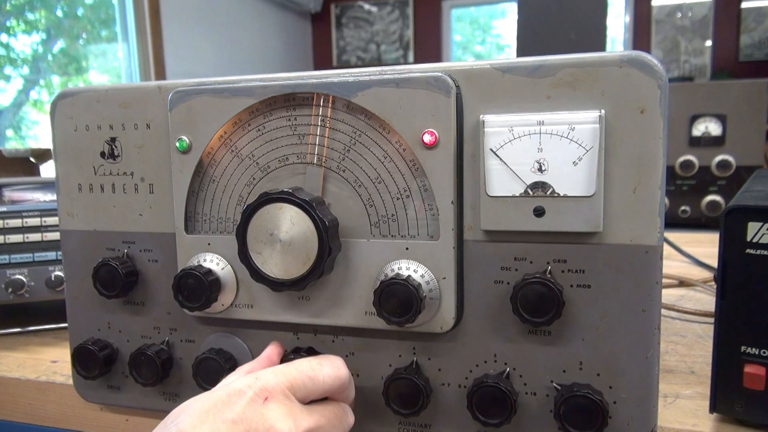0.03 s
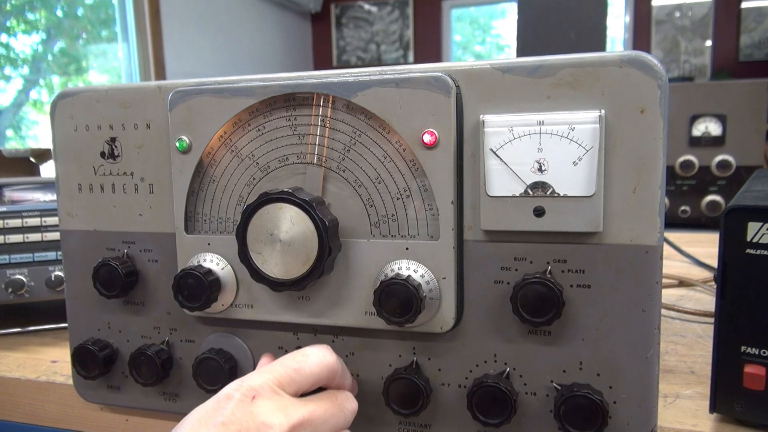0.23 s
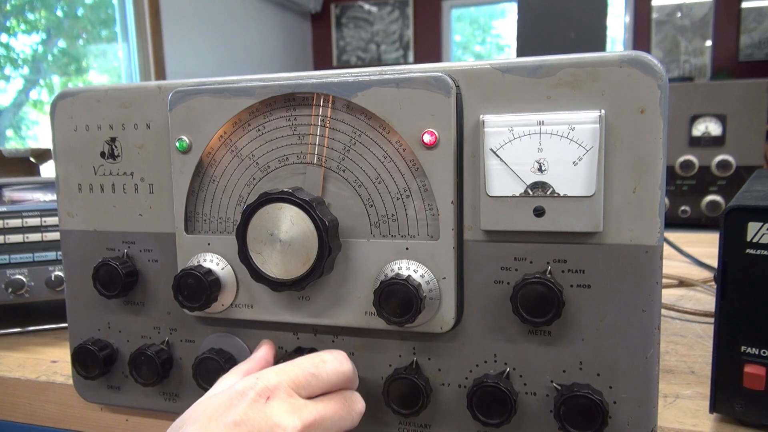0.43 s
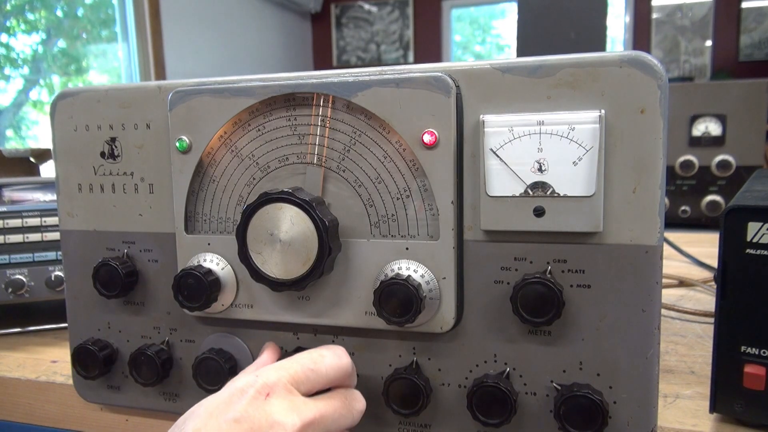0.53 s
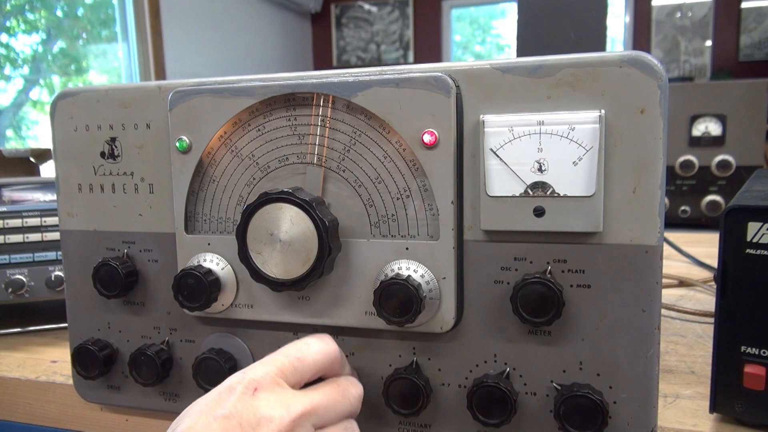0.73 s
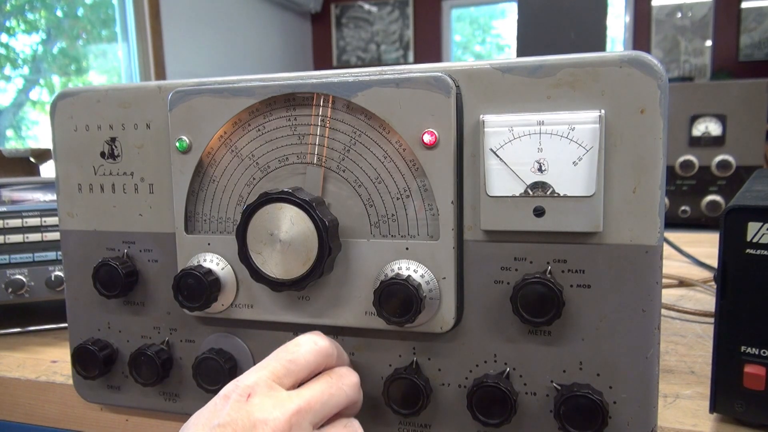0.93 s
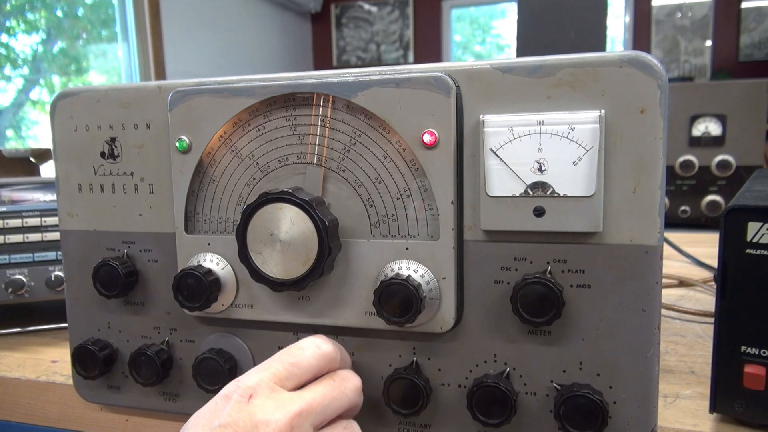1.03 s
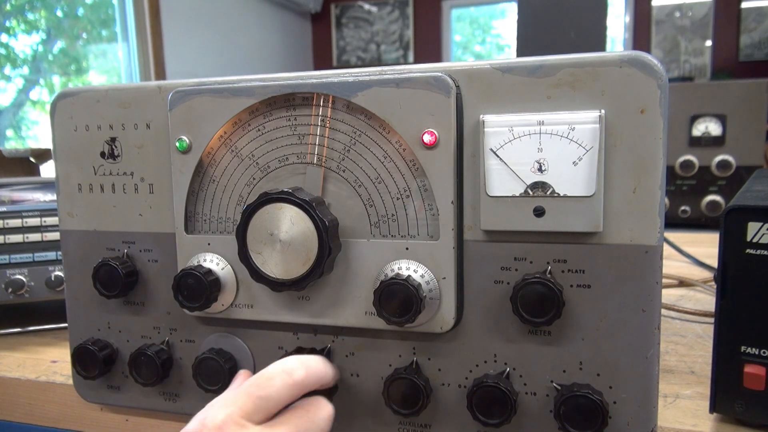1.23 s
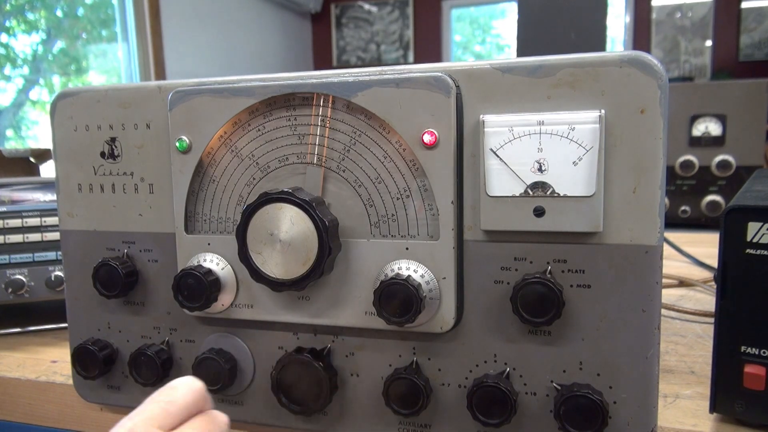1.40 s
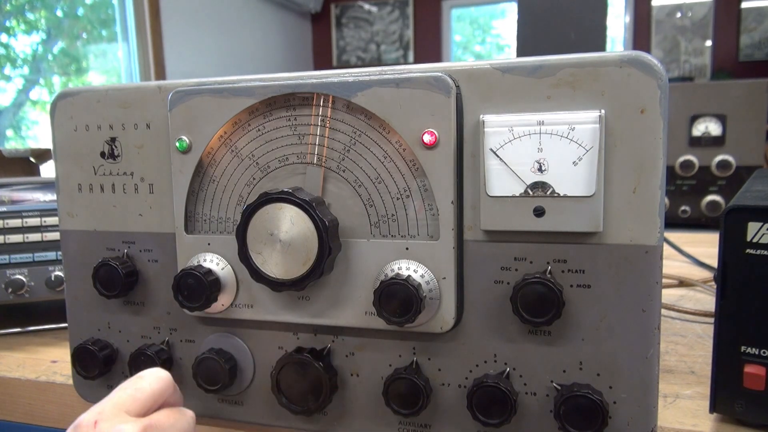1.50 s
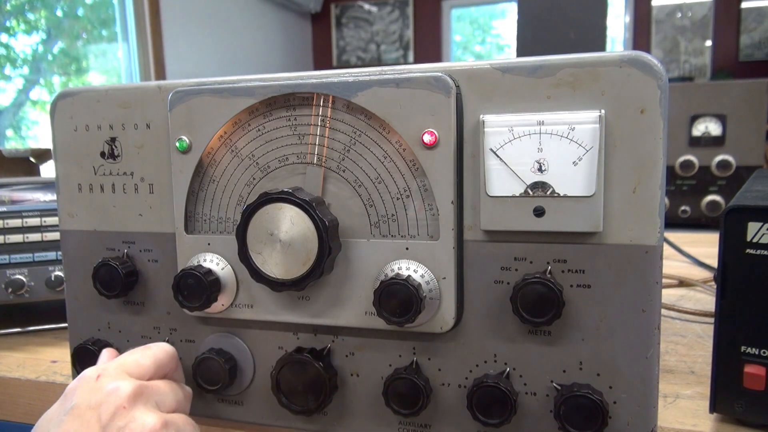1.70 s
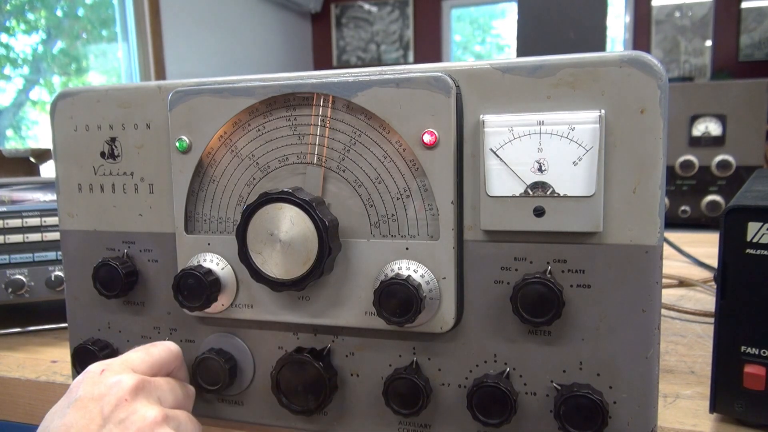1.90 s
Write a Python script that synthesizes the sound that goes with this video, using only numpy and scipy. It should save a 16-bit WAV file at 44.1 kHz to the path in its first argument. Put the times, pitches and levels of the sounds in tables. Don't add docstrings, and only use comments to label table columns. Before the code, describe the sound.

Close to a camera microphone in a small workshop, a hand turns a heavy knob: one loud metallic clack, a faint finger shift, then a second clack, over steady electrical hum and fan hiss.

```python
import sys
import numpy as np
from scipy import signal
from scipy.fft import rfft, irfft
from scipy.io import wavfile
from scipy.ndimage import uniform_filter1d

SR = 44100
rng = np.random.default_rng(int(sys.argv[2]) if len(sys.argv) > 2 else 0)


def volts_from_decibels(level):
    exponent = np.asarray(level, float) / 20
    return 10 ** exponent


def wrap_up_sound(samples):
    columns = np.atleast_2d(samples).T
    tamed = np.clip(columns, -1, 1)
    steps = np.round(tamed * 32767).astype(np.int16)
    wavfile.write(sys.argv[1], SR, steps)


N = 85995

# (time [s], level [dB], brightness [dB])
FIRST_KNOCKS = [(.197, -29, -18), (.203, -35, -7), (.208, -21, 0), (.213, -22, 6.5), (.2165, -13, -2),
                (.221, -17, 15), (.2232, -7.5, 5), (.2243, -1.5, 1.5), (.2295, -1, 2), (.236, -10, -10),
                (.242, -11.5, -3), (.249, -19, -25.5), (.260, -14.5, -2), (.281, -26, -4)]
# (time [s], level [dB], brightness [dB])
SECOND_KNOCKS = [
    (.820, -24, -4),
    (.8265, -6.5, 2.5),
    (.829, -11, 5),
    (.8325, -7, 7),
    (.837, -4, -13.5),
    (.8405, -3.5, -17),
    (.8445, -6.5, -10),
    (.849, -10, -10),
    (.870, -16, -8),
    (.936, -31, 8.5),
]


def evened(x):
    return x / np.sqrt(np.mean(x ** 2) + 1e-20)


def read(points, hz):
    f, value = np.transpose(points)
    return np.interp(np.log(hz + 1), np.log(f + 1), value)


def coloured(x, points):
    return irfft(rfft(x) * volts_from_decibels(read(points, np.fft.rfftfreq(N, 1 / SR))), N)


def drift(rate_hz):
    t = np.arange(N) / SR
    rates = rate_hz * np.geomspace(.1, 1, 12)
    return evened(sum(np.sin(2 * np.pi * (f * t + rng.random())) / np.sqrt(f) for f in rates))


def ring(knocks, modes, db, damp):
    rise_cycles, wobble_rad = 3.1, 0.64
    t, out = np.arange(N) / SR, np.zeros(N)
    since = np.maximum(t - np.array(knocks)[:, :1], 0)
    strength = volts_from_decibels(np.array(knocks)[:, 1:2])
    for hz, width_hz, level_db in modes:
        swell = 1 - np.exp(-since * hz / rise_cycles)
        decay = np.exp(-np.pi * width_hz * damp * since / 2)
        energy = ((strength * swell * decay) ** 2).sum(0)
        shake = wobble_rad * evened(uniform_filter1d(rng.standard_normal(N), size=500))
        tone = np.sin(2 * np.pi * (hz * t + rng.random()) + shake)
        out = out + volts_from_decibels(db + level_db) * np.sqrt(energy) * tone
    return out


def cabinet_ring():
    # (frequency [Hz], width [Hz], level [dB])
    first_modes = [(503.5, 23, -2), (660, 44, 0.5), (835, 51, 7.5), (1165, 14, -11), (1371, 23.5, -15),
                   (1463, 24, -12), (1610, 23, -4.5), (1761, 51, 0.5), (2380, 18, -19.5), (291, 26.6, 2),
                   (380.8, 17.3, -5.5)]
    # (frequency [Hz], width [Hz], level [dB])
    second_modes = [(487, 21, -10), (629.4, 24, -9.5), (829, 72, -11), (1250, 380, -16), (1520, 19, -42),
                    (1581, 43, 6), (2002, 34, -10), (2180, 43, -23), (445, 37, -18), (1062, 69, -4),
                    (3086, 39, -3.5), (3140, 9.3, -20), (1572, 16, -13)]
    first = ring(FIRST_KNOCKS, first_modes, db=-7.5, damp=2.15)
    return first + ring(SECOND_KNOCKS, second_modes, db=-5.5, damp=2.05)


def bench_thump():
    # (time [s], level [dB])
    thumps = [
        (.232, -24),
        (.84, -28),
        (.89, -35),
    ]
    # (frequency [Hz], width [Hz], level [dB])
    bench_modes = [(151.6, 14.4, 1.5), (205, 21, -7), (248, 18.5, 0), (283, 20, 5.5)]
    return ring(thumps, bench_modes, db=0, damp=0.7)


def bursts(knocks, bright):
    rise_s, t60_s = 0.0004, 0.021
    out, t = np.zeros(N), np.arange(2000) / SR
    for s, db, bright_db in knocks:
        shape = np.minimum(t / rise_s, 1) * volts_from_decibels(db + bright * bright_db - 60 * t / t60_s)
        out[round(s * SR):][:2000] += shape * rng.standard_normal(2000)
    return out


def crack(knocks, colour):
    treble_hz, crack_db = 2500, -4.5
    unit = np.sqrt(np.mean(volts_from_decibels(read(colour, np.fft.rfftfreq(N, 1 / SR))) ** 2))
    low, high = (signal.butter(2, treble_hz, kind, fs=SR) for kind in ("low", "high"))
    edge = signal.lfilter(*low, bursts(knocks, False)) + signal.lfilter(*high, bursts(knocks, True))
    return volts_from_decibels(crack_db) * coloured(edge, [(60, -74)] + colour) / unit


def switch_cracks():
    # (time [s], level [dB], brightness [dB])
    touches = [
        (.578, -57, 17),
        (.584, -43.5, 15.5),
        (1.766, -45, 3),
    ]
    # (frequency [Hz], density [dB per Hz])
    first_colour = [(180, -47), (300, -1.5), (1240, -6.5), (1730, -1), (2090, -15), (2660, -9), (7860, -19),
                    (13500, -39)]
    # (frequency [Hz], density [dB per Hz])
    second_colour = [(240, -12), (400, -5.5), (1570, -5), (3090, -13.5), (4490, -9), (9810, -24.5),
                     (12700, -29), (14500, -97)]
    return crack(FIRST_KNOCKS, first_colour) + crack(SECOND_KNOCKS + touches, second_colour)


def room(x, sent):
    # (frequency [Hz], t60 [s])
    room_t60 = [(200, 0.38), (530, 0.43), (1390, 0.27), (3680, 0.29), (9700, 0.29)]
    # (frequency [Hz], side minus mid [dB])
    click_side = [(60, -35), (110, -41), (200, -17), (380, -16), (700, -9.5), (1290, -4), (2380, -4.5),
                  (4400, -8.5), (8120, -5), (15000, -14)]
    # (frequency [Hz], left minus right [dB])
    left_lean = [(60, -4), (110, 4.5), (200, -1.5), (380, 1.5), (700, -0.5), (1290, -1), (2380, 2),
                 (4400, 2.5), (8120, 3), (15000, -4)]
    room_db, gap_s = -1.5, 0.0033
    taps = np.zeros((2, SR // 2))
    slots = np.arange(0, SR // 2 - 20, 20)
    at = slots + rng.integers(0, 20, (2, len(slots)))
    np.put_along_axis(taps, at, rng.choice([-1., 1.], (2, len(slots))), 1)
    hz, t, z = signal.stft(taps, SR, nperseg=256)
    tail = signal.istft(z * volts_from_decibels(-60 * t / read(room_t60, hz)[:, None]), SR, nperseg=256)[1]
    tail = tail * np.minimum(np.arange(tail.shape[1]) / SR / gap_s, 1)
    mid, side = signal.fftconvolve(sent[None], tail / np.linalg.norm(tail[0]), axes=1)[:, :N]
    mid = x + volts_from_decibels(room_db) * mid
    side = coloured(side, click_side)
    half = np.array(left_lean) * [1, .5]
    return np.array([coloured(mid, half) + side, coloured(mid, half * [1, -1]) - side])


def switch():
    rings = cabinet_ring() + bench_thump()
    cracks = switch_cracks()
    heard = room(rings + cracks, sent=volts_from_decibels(-6) * rings + cracks)
    low_cut = signal.butter(4, 120, "high", fs=SR, output="sos")
    return signal.sosfilt(low_cut, heard)


def hum():
    # (time [s], pitch [Hz], level [dB], buzz [dB])
    hum_course = [(0, 101.5, -39, 8.5), (.2, 103.5, -35, -1), (0.299, 101.7, -36.5, -32),
                  (.45, 101.7, -35, 6.5), (.6, 101.3, -35, 3.5), (.78, 100.3, -39, -4),
                  (1.0, 100.2, -38.5, 3), (1.2, 100.4, -34, -4.5), (1.45, 101, -34, 0),
                  (1.65, 101.7, -31.5, -8.5), (1.95, 102, -30, -4.5)]
    # (multiple [of pitch], level [dB], waver [dB])
    hum_overtones = [(2, -19, 5.5), (3, -12, 1.1)]
    s, hz, db, buzz_db = np.transpose(hum_course)
    t = np.arange(N) / SR
    turn = 2 * np.pi * np.cumsum(np.interp(t, s, hz)) / SR
    tone = volts_from_decibels(0.97 * drift(12)) * np.sin(turn)
    buzz = [np.zeros(N), np.interp(t, s, buzz_db)]
    for (multiple, level_db, waver_db), extra_db in zip(hum_overtones, buzz):
        gain = volts_from_decibels(level_db + extra_db + waver_db * drift(30.09))
        tone = tone + gain * np.sin(multiple * turn + multiple)
    return np.sqrt(2) * volts_from_decibels(np.interp(t, s, db)) * tone


def fan():
    # (frequency [Hz], rms level [dB])
    fan_orders = [(26.9, -64), (53.8, -66), (102.3, -36), (129.2, -59.5), (156.1, -54), (209.9, -60.5),
                  (236.9, -68.5), (258.4, -68.5)]
    makeup_db, waver_db = 3.5, 3
    t, out = np.arange(N) / SR, np.zeros(N)
    for hz, db in fan_orders:
        if abs(hz - 101) > 8:
            gain = np.sqrt(2) * volts_from_decibels(db + makeup_db + waver_db * drift(8.37))
            out = out + gain * np.sin(2 * np.pi * (hz * t + rng.random()))
    return out


def air():
    # (frequency [Hz], density [dB per Hz])
    air_colour = [(65, -18.5), (110, -16), (153, -18), (313, -17), (481, -25), (836, -26), (907, -27.5),
                  (2740, -32.5), (14700, -49)]
    # (frequency [Hz], side minus mid [dB])
    air_side = [(60, -58.5), (110, -58.5), (200, -26.5), (380, -12), (700, -6.5), (1290, -3.5), (2380, -5),
                (4400, -4.5), (8120, -7), (15000, -21)]
    air_db, makeup_db, patch_db = -43.5, 3.5, 0.64
    rumble_db, whine_db, whine_hz, whine_width_hz = -5, 5, 15300, 260
    frames, hz = N // 512 + 5, np.fft.rfftfreq(2048, 1 / SR)
    a, b, c, d, patches = rng.standard_normal((frames, 1025, 5)).T
    patches = uniform_filter1d(patches, size=20, axis=0)
    patches = evened(uniform_filter1d(patches, size=4, axis=1))
    whine = whine_db * np.exp(-((hz - whine_hz) / whine_width_hz) ** 2)
    level_db = read(air_colour, hz) + rumble_db * (hz < 85) + whine
    z = np.array([a + 1j * b, (c + 1j * d) * volts_from_decibels(read(air_side, hz))[:, None]])
    z = z * volts_from_decibels(level_db[:, None] + patch_db * patches)
    z = z / np.sqrt(np.mean(abs(z[0, 20:]) ** 2))
    mid, side = signal.istft(z, nperseg=2048, noverlap=1536)[1][:, :N] / 32
    return volts_from_decibels(air_db + makeup_db) * np.array([mid + side, mid - side])


def scene():
    return switch() + hum() + fan() + air()


def low_passed(x, hz):
    return signal.oaconvolve(x, signal.firwin(511, hz, window=("kaiser", 9), fs=SR)[None], "same")


def band_limit(x):
    return signal.sosfilt(signal.butter(12, 15900, fs=SR, output="sos"), x)


def record(dry):
    knee_db, squeeze, recover_db_per_s = -26.5, .3, 6
    edge_hz, starved_hz, starved_db = 15750, 13300, -29
    power_db = 10 * np.log10(abs(uniform_filter1d((dry ** 2).mean(0), size=600)) + 1e-12)
    fall = np.arange(N) * recover_db_per_s / SR
    held_db = np.maximum.accumulate(power_db + fall) - fall
    over_db = np.maximum(held_db - knee_db, 0)
    ducked = dry / volts_from_decibels(squeeze * signal.lfilter([.002], [1, -.998], over_db))
    calm = uniform_filter1d(ducked.mean(0) ** 2, size=1200) < volts_from_decibels(2 * starved_db)
    calm = uniform_filter1d(1. * calm, size=300)
    mix = calm * low_passed(ducked, edge_hz) + (1 - calm) * low_passed(ducked, starved_hz)
    return band_limit(mix)


dry = scene()
out = record(dry)
wrap_up_sound(out)
```